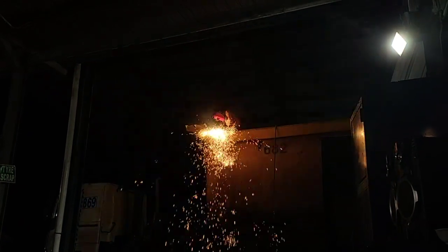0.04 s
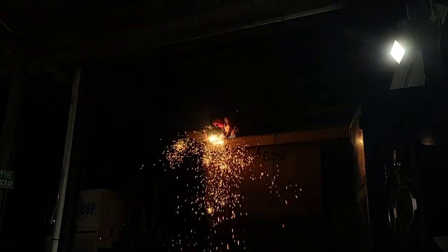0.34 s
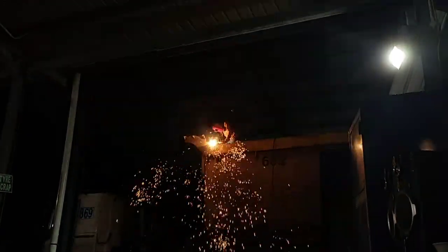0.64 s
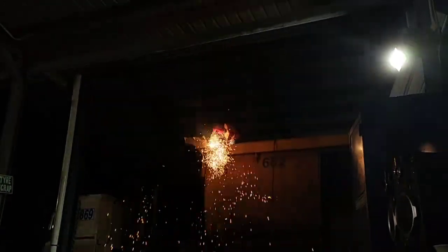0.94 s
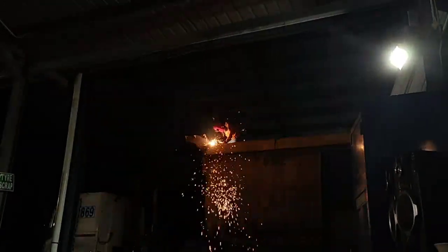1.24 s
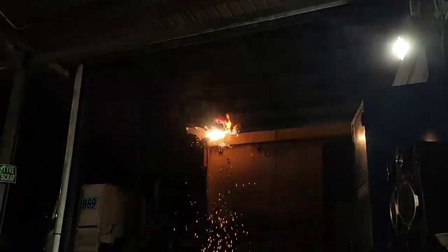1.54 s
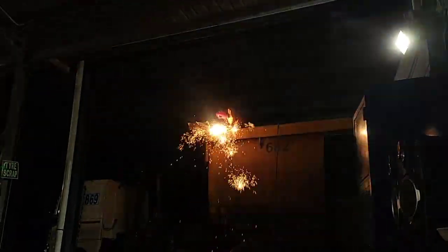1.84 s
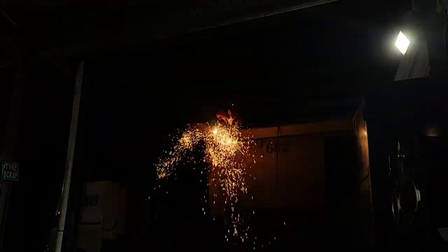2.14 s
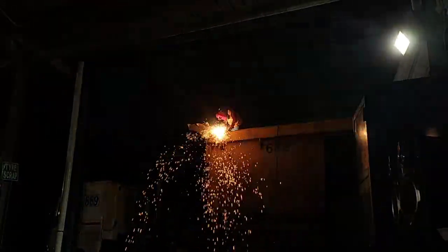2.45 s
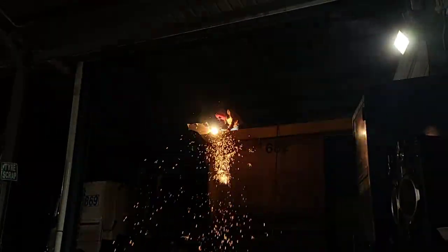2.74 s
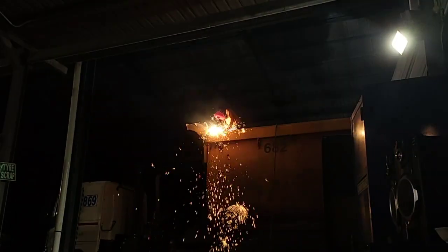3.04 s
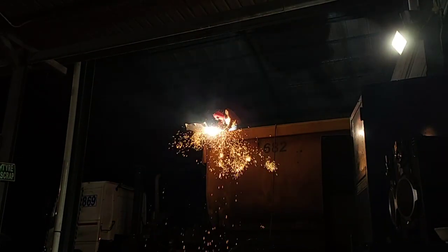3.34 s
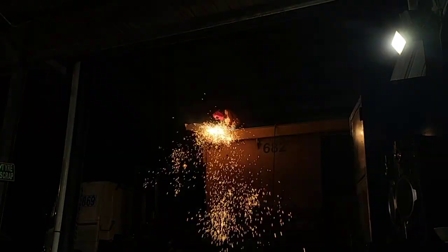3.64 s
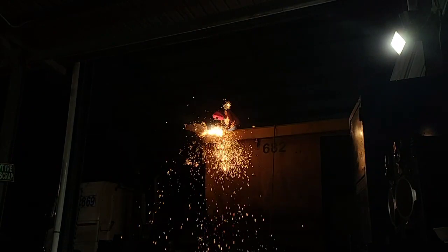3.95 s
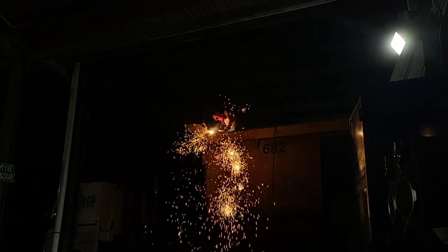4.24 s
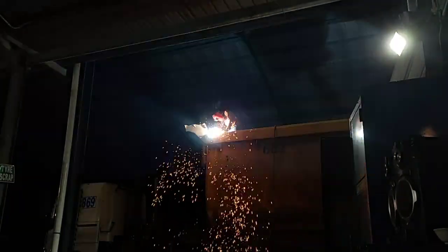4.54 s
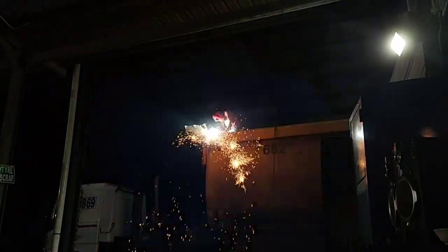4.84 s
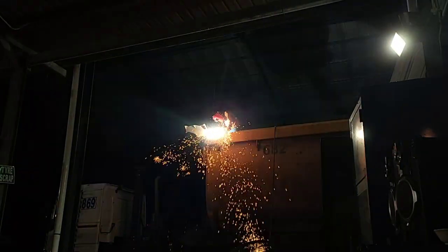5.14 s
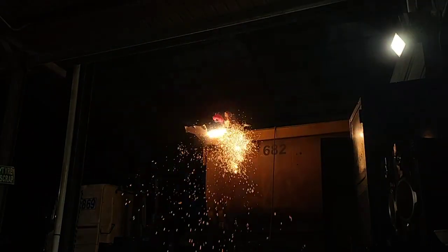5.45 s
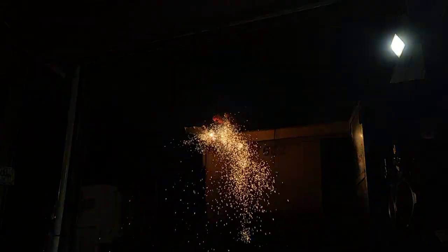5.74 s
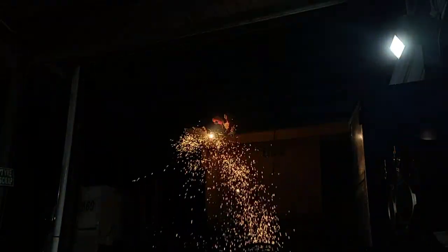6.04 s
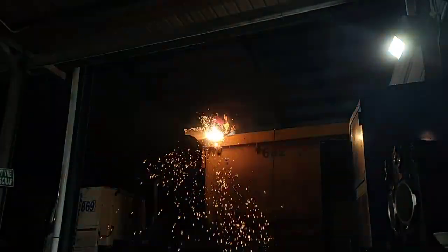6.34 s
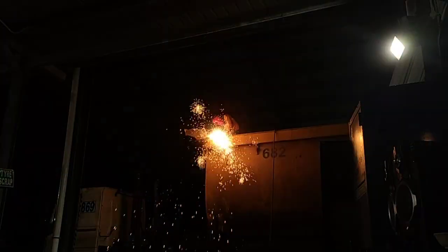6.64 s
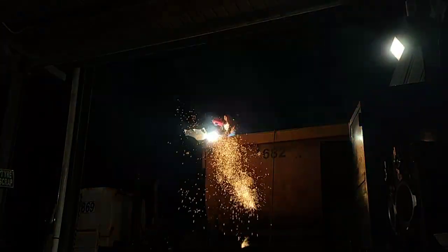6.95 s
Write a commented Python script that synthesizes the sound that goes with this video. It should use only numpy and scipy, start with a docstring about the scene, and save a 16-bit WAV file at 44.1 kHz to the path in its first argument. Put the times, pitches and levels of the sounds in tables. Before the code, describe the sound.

Loud, continuous hissing comes from a gas torch cutting steel in an open-sided workshop, heard from several metres off. About every half second it bites into the metal with a rough, fluttering roar, spitting crackles and brief pops, at times with a faint high whistle. Between surges the plain hiss returns. A low generator drone sits quietly underneath the whole time, and the space adds a short echo.

```python
"""A cutting torch works on a steel plate under an open shed roof, some metres away.
Its turbulent gas jet hisses while it runs free; whenever it bites, the cut roars and the melt sputters.
Gas pockets in the melt gurgle and pop as cavity resonators, the flame puffs, and the cleared slot whistles.
Behind it a generator hums at the harmonics of its firing rate.
Plate and shed resonate, and reflections from roof and walls spread the torch into a wide wash."""
import sys
import numpy as np
from scipy.fft import rfft, irfft, next_fast_len
from scipy.io import wavfile
from scipy.ndimage import uniform_filter1d, minimum_filter1d

SR = 44100
rng = np.random.default_rng(int(sys.argv[2]) if len(sys.argv) > 2 else 0)


def log_audio(samples):
    """Write samples as a 16-bit WAV file to the path given in sys.argv[1]."""
    # one column per channel
    frames = np.atleast_2d(samples).T
    # limit to full scale, then quantise
    limited = np.clip(frames, -1, 1)
    pcm = np.round(limited * 32767).astype(np.int16)
    wavfile.write(sys.argv[1], SR, pcm)


N = 312669
TIME = np.arange(N) / SR
SIZE = next_fast_len(N + SR)
FREQ = np.arange(SIZE // 2 + 1) * SR / SIZE

# hiss of the free-running jet: t/s, level/dB
JET_LEVELS = [(0.0, -25.5), (0.3, -26), (0.8, -22), (1.42, -25), (1.83, -22.5), (2.15, -27), (2.42, -24),
              (2.57, -24.5), (3.11, -20), (3.45, -25.5), (3.96, -21.5), (4.16, -24.5), (4.72, -22),
              (4.93, -26), (5.45, -22), (6.15, -28), (6.45, -21.5), (7.09, -25)]
# running of the engine: t/s, firing rate/Hz, level/dB
ENGINE_RUN = [(0.0, 54.4, -44.5), (0.37, 55.7, -46), (1.05, 55.6, -39.5), (1.46, 55.8, -48),
              (1.58, 54.6, -40), (2.38, 53.97, -47.5), (2.49, 54.57, -39), (4.03, 54.6, -43.5),
              (4.29, 55.4, -44), (4.35, 55.8, -41), (5.11, 55.8, -47), (5.26, 54.1, -41),
              (5.73, 54.8, -42.5), (5.92, 53.1, -49), (6.16, 55.9, -46), (6.36, 55.2, -44),
              (6.47, 54.5, -39), (7.0, 54.9, -41)]
# exhaust note: harmonic number, relative level/dB
EXHAUST_HARMONICS = [(1, -0.5), (2, -5), (3, -33), (4, -24)]
# the jet bites into fresh melt: t/s, duration/s, sputter level/dB, roar level/dB
JET_BITES = [(0.01, 0.089, -29.5, -18.5), (0.326, 0.054, -26.5, -22.5), (0.663, 0.022, -24, -19),
             (0.812, .09, -26.5, -30), (0.904, .13, -25.5, -20.5), (1.24, 0.028, -22.5, -19.5),
             (1.444, 0.48, -27, -23.5), (1.878, 0.13, -34.5, -20), (2.366, 0.045, -22.5, -19),
             (2.479, 0.079, -25, -25), (2.713, .22, -27.5, -21.5), (3.106, .19, -25.5, -20.5),
             (3.467, 0.2, -26.5, -21.5), (3.807, 0.17, -27.5, -24), (3.96, 0.12, -33, -20.5),
             (4.442, .02, -28, -29), (4.626, 0.1, -27, -22.5), (4.72, 0.1, -25, -19),
             (5.036, .46, -27, -23), (5.511, .14, -25, -21), (5.879, .025, -23, -17), (6.326, .3, -27, -24),
             (6.572, 0.15, -26.5, -20), (7, 0.045, -24.5, -18.5)]
# bursts of molten steel: t/s, relative level/dB, cavity f/Hz
MELT_POPS = [(0.341, -18, 2156), (0.671, -10, 2220), (0.817, -11, 2230), (0.849, -21, 1307),
             (0.899, -15, 2530), (0.997, -14, 2100), (1.25, -12.5, 2166), (1.274, -17, 2176),
             (1.719, -15, 2665), (1.803, -14, 2050), (2.385, -16.5, 2970), (2.482, -15, 2130),
             (2.967, -26, 2610), (4.065, -18, 2250), (4.256, -17, 2860), (4.63, -15, 2140),
             (4.691, -14.5, 2480), (4.732, -17, 2120), (5.034, -18, 1440), (5.085, -15, 1960),
             (5.446, -17, 2630), (5.885, -14, 2606), (6.342, -15.5, 2116), (6.527, -15, 2720)]
# spectral densities of the five noises: f/Hz, relative level/dB
HISS_SPECTRUM = [(60, -16), (140, -12.5), (350, -18), (700, -14.5), (1700, -6.5), (3000, -3.5), (4000, -6),
                 (4900, -9.5), (5600, -7), (6700, -8.5), (8300, -20.5), (10200, -13), (11300, -13.5),
                 (12300, -18), (15500, -24)]
RUMBLE_SPECTRUM = [(18, -22), (30, 1), (41, 3), (75, -8), (130, -1), (300, -8.5), (800, -24.5)]
SPUTTER_SPECTRUM = [(60, -33), (170, -18), (400, -19), (720, -9.5), (950, -8), (1120, -3.5), (1450, -1),
                    (1850, -3.5), (2200, 2.5), (2700, -3.5), (3700, -14), (5000, -15.5), (12000, -49)]
ROAR_SPECTRUM = [(100, -28), (330, -28.5), (550, -20), (1000, -18), (1850, -9), (2850, 1.5), (3450, -3.5),
                 (4100, -4.5), (4900, -14), (6300, -15.5), (8300, -30), (10500, -37), (15500, -52)]
FLAME_SPECTRUM = [(50, -8), (130, 0.5), (180, 2.5), (320, -5), (600, -12.5), (1500, -56)]
# dips that the slot, acting as a pipe, cuts into the roar: f/Hz, bandwidth/Hz, gain/dB
SLOT_NOTCHES = [(3020, 22, -4), (3123, 55, -4)]
# whistling modes of the cleared slot: f/Hz, bandwidth/Hz, relative level/dB
WHISTLE_MODES = [(2895, 60, -1), (3070, 54, -1), (3132, 31, 3)]
# resonances of plate and shed: f/Hz, bandwidth/Hz, gain/dB
PLATE_AND_SHED_MODES = [(305, 14, 5), (680, 18, 3.5), (1464, 18, 5.5), (1936, 16, 3.5), (1798, 16, 3),
                        (2131, 25, 2.5), (2207, 18, 4.5), (2679, 25, 2), (2876, 24, 3), (3065, 20, 2.5),
                        (3132, 14, 6), (3496, 18, 3.5), (3998, 22, 4)]
# likeness of the left and right echoes: f/Hz, correlation
ECHO_CORRELATION = [(100, 0.81), (300, 0.9), (700, 0.55), (1100, 0.32), (1700, 0.06)]
# balance of the two channels: f/Hz, left minus right level/dB
CHANNEL_BALANCE = [(400, 0.5), (1100, -0.5), (1500, -3.5), (2000, -3.5), (2800, -12.5), (3400, -5),
                   (4100, 0), (5100, 5.5), (6200, 2.5), (7400, 1.5), (8600, 6), (10500, 3), (12500, 1.5),
                   (14000, 5.5)]


def undb(db):
    """Amplitude ratio of a level in decibels."""
    return 10 ** (np.asarray(db) / 20)


def curves(table):
    """Linear interpolation of a timed table's columns, one value per sample."""
    times, *columns = np.transpose(table)
    return [np.interp(TIME, times, column) for column in columns]


def across(table):
    """Interpolation of a table (f/Hz, value) along a logarithmic frequency axis."""
    hz, value = np.transpose(table)
    return np.interp(np.log(FREQ + 1), np.log(hz), value)


def colour(table):
    """Frequency response of a spectrum, normalised to unit power."""
    gain = undb(across(table))
    return gain / np.sqrt(np.mean(gain ** 2))


def through(x, response):
    """Linear filtering: the spectrum is multiplied by a frequency response."""
    return irfft(rfft(x, SIZE) * response, SIZE)[..., :N]


def walk(cutoff_hz):
    """Low-pass noise: a smooth random fluctuation of unit variance."""
    x = through(rng.standard_normal(N), 1 / (1 + (FREQ / cutoff_hz) ** 4))
    return x / x.std()


def crackle(rate_hz, spread_db):
    """A Poisson process of clicks, many small and few large, with unit power."""
    size = undb(spread_db * np.minimum(rng.exponential(size=N), 4))
    x = (rng.random(N) < rate_hz / SR) * size * rng.choice([-1, 1], N)
    return x / x.std()


def resonance(hz, width_hz, db):
    """A damped resonance raises a peak, or cuts a dip, in a flat response."""
    return 1 + (undb(db) - 1) / (1 + 2j * (FREQ - hz) / width_hz)


def resonances(table):
    """Resonances in cascade: their responses multiply."""
    return np.prod([resonance(*mode) for mode in table], axis=0)


def jet_hiss(hiss_db, flicker_db):
    """Turbulence in the free jet radiates broadband noise whose level flickers slightly."""
    return rng.standard_normal(N) * undb(hiss_db + flicker_db)


def generator():
    """Periodic firing gives a harmonic series, slightly uneven, over a soft rumble."""
    firing_hz, level_db = curves(ENGINE_RUN)
    phase = 2 * np.pi * np.cumsum(firing_hz * (1 + 0.0094 * walk(4.3))) / SR
    note = 0
    for harmonic, db in EXHAUST_HARMONICS:
        amplitude = np.sqrt(2) * undb(db + 2.4 * walk(9.6))
        note = note + amplitude * np.sin(harmonic * phase + rng.uniform(0, 2 * np.pi))
    rumble = through(rng.standard_normal(N), colour(RUMBLE_SPECTRUM))
    return note * undb(level_db) + undb(-54) * rumble


def bite_level(peaks_db, attack_s, release_s, idle_db):
    """Incoherent addition: each bite rises, holds and decays, its power added to the idling cut (dB)."""
    power = undb(idle_db) ** 2
    for (start, length, *_), db in zip(JET_BITES, peaks_db):
        age = np.maximum(TIME - start, 0)
        envelope = (1 - np.exp(-age / attack_s)) * np.exp(-np.maximum(age - length, 0) / release_s)
        power = power + (undb(db) * envelope) ** 2
    return 10 * np.log10(power)


def cut_levels(swallow_db_per_db=0.95, lag_s=0.079):
    """Sputter, roar and hiss (dB): bites drive the first two; hiss yields to roar by a first-order lag."""
    _, _, sputter_peaks, roar_peaks = np.transpose(JET_BITES)
    roar_idle_db = -27.5
    sputter_db = bite_level(sputter_peaks, attack_s=0.0055, release_s=0.097, idle_db=-40)
    roar_db = bite_level(roar_peaks, attack_s=0.011, release_s=0.21, idle_db=roar_idle_db)
    lag = 1 / (1 + 2j * np.pi * FREQ * lag_s)
    swallowed_db = swallow_db_per_db * through(roar_db - roar_idle_db, lag)
    return sputter_db, roar_db, curves(JET_LEVELS)[0] - swallowed_db


def melt_sputter(sputter_db, flutter):
    """Shot noise: droplets tear off the melt, more of them the harder the jet bites."""
    rate_hz = 900 * undb(0.7 * (sputter_db - sputter_db.mean()))
    return crackle(rate_hz, spread_db=3.0) * undb(sputter_db + 1.5 * flutter - 1.0)


def kerf_roar(roar_db, flutter):
    """Turbulent flow carries gas and fine sparks through the slot: a fluttering, gritty roar."""
    rush = rng.standard_normal(N) + undb(-0.5) * crackle(1400, spread_db=4.0)
    return rush * undb(roar_db + 0.37 * flutter - 3.0)


def ragged_slot(depth_db=4.0, spacing_hz=110, top_hz=4500):
    """An irregular stretch of slot has random resonances; their ripple fades out in the treble."""
    knots = np.arange(0, SR / 2, spacing_hz)
    heights = rng.standard_normal(SR)[:len(knots)]
    ripple = uniform_filter1d(np.interp(FREQ, knots, heights), size=600)
    gain = undb(depth_db * ripple / ripple.std() / (1 + (FREQ / top_hz) ** 4))
    return gain / np.sqrt(uniform_filter1d(gain ** 2, size=9000))


def shed(direct_db, early_s=0.0049, late_db=-5, t60_s=0.33, right_lag_s=0.00013):
    """Multipath propagation: stereo response of direct sound, early reflections and reverberant tail."""
    t = TIME[:SR]
    early = np.exp(-t / early_s) / np.sqrt(early_s)
    late = undb(late_db - 60 * t / t60_s) / np.sqrt(t60_s / np.log(1000))
    fade = early + late
    mid, side = rfft(rng.standard_normal((2, SR)) * fade / np.linalg.norm(fade), SIZE)
    alike, sign = np.clip(across(ECHO_CORRELATION), -1, 1), np.array([[1], [-1]])
    echoes = mid * np.sqrt((1 + alike) / 2) + sign * side * np.sqrt((1 - alike) / 2)
    # the torch stands a little to the left, so its sound arrives later on the right
    direct = undb(direct_db) * np.exp(-2j * np.pi * FREQ * np.array([[0], [right_lag_s]]))
    response = echoes + direct
    # the walls ripple the spectrum finely but leave its broad shape alone
    return response / np.sqrt(uniform_filter1d(abs(response) ** 2, size=700, axis=1))


def wandering_jet(sputter_db, roar_db, hiss_db, spots=6, roar_ripple=0.74):
    """Superposition: the jet's power drifts among spots, each with its own resonances and echoes."""
    melt_flutter, kerf_flutter, flicker_db = walk(47), walk(36), walk(14)
    shares = undb(7 * np.array([walk(4) for _ in range(spots)]))
    shares /= np.linalg.norm(shares, axis=0)
    ripples = np.array([ragged_slot() for _ in range(spots)])
    ripples /= np.sqrt(np.mean(ripples ** 2, axis=0))
    droplets = colour(SPUTTER_SPECTRUM)
    slot = colour(ROAR_SPECTRUM) * resonances(SLOT_NOTCHES)
    nozzle = colour(HISS_SPECTRUM) * resonance(hz=5690, width_hz=140, db=5.0)  # a faint whistle
    total = 0
    for share, ripple in zip(shares, ripples):
        sputter = rfft(share * melt_sputter(sputter_db, melt_flutter), SIZE) * droplets * ripple
        roar = rfft(share * kerf_roar(roar_db, kerf_flutter), SIZE) * slot * ripple ** roar_ripple
        hiss = rfft(share * jet_hiss(hiss_db, flicker_db), SIZE) * nozzle
        total = total + (sputter + roar + hiss) * shed(direct_db=-12)
    return irfft(total, SIZE)[:, :N]


def flame_puffs(sputter_db, hiss_db):
    """Combustion noise: low puffs, loudest when a strong jet meets fresh melt."""
    puff_db = 0.37 * (sputter_db - sputter_db.mean()) + 1.5 * (hiss_db - hiss_db.mean())
    puffs = rng.standard_normal(N) * undb(puff_db + 2.0 * walk(22) - 50)
    return through(puffs, colour(FLAME_SPECTRUM))


def cavity(hz, life_s, glide=0.056):
    """Cavity resonance: the tone of a gas pocket in the melt swells, decays and rises a little in pitch."""
    age = TIME[:SR // 8] / life_s
    phase = 2 * np.pi * hz * life_s * age * (1 + glide * age / 10)
    return age * np.exp(1 - age) * np.sin(phase)


def gurgle(sputter_db, count=420, life_s=0.0027, low_hz=1050, high_hz=2700, level_db=-4):
    """Pockets of all sizes resonate at random times, loudest while the melt sputters."""
    out = np.zeros(N + SR)
    for when, pitch, life, strength in rng.random((count, 4)):
        start = int(when * N)
        pocket = cavity(low_hz * (high_hz / low_hz) ** pitch, life_s * (0.5 + life))
        out[start:start + len(pocket)] += pocket * strength * undb(sputter_db[start] + level_db)
    return out[:N]


def slot_whistle(sputter_db, roar_db, level_db=-5, clear_db=10, transition_db=1.5):
    """Pipe resonance: once the melt is blown clear and roar outweighs sputter, the slot whistles."""
    opening = 1 / (3 + np.exp((clear_db - roar_db + sputter_db) / transition_db))
    pipe = sum(undb(db) / (1 + 2j * (FREQ - hz) / width_hz) ** 2 for hz, width_hz, db in WHISTLE_MODES)
    gas = rng.standard_normal(N) * opening * undb(roar_db + level_db)
    return through(gas, pipe / np.sqrt(np.mean(abs(pipe) ** 2)))


def slag_choke(sag_db=2.5, sag_s=0.016, kick_db=1.5, kick_s=0.01, full_pop_db=-19):
    """Flow obstruction: slag plugs the slot before each pop, then lets go; the level sags, then kicks."""
    change_db, t = np.zeros(N + SR), TIME[:SR // 8]
    shape_db = np.concatenate([-sag_db * np.exp(-t[::-1] / sag_s), kick_db * np.exp(-t / kick_s)])
    for onset_s, db, _ in MELT_POPS:
        start = int(onset_s * SR) - len(t)
        change_db[start:start + len(shape_db)] += min(undb(db - full_pop_db), 1) * shape_db
    return change_db[:N]


def pops(hiss_db, crack_s=0.0031, spray_db=-14, spray_s=0.046, ring_db=-6, ring_s=0.0068, thump_db=-22):
    """Impulsive excitation: a crack, a ringing cavity, thinning spray and a thump that grows with the jet."""
    cracks, tones, t = np.zeros(N + SR), np.zeros(N + SR), TIME[:SR // 8]
    fade = np.exp(-t / crack_s) + undb(spray_db) * np.exp(-t / spray_s)
    for onset_s, db, hz in MELT_POPS:
        start = int(onset_s * SR)
        span = slice(start, start + len(t))
        cracks[span] += undb(db) * rng.standard_normal(len(t)) * fade
        tones[span] += undb(db + ring_db) * cavity(hz, ring_s)
    thumps = through(cracks[:N] * undb(thump_db + hiss_db - hiss_db.mean()), colour(FLAME_SPECTRUM))
    ragged = undb(1.9 * walk(300) - 3.5)  # the slag tears off in pieces
    return through(cracks[:N] * ragged, colour(SPUTTER_SPECTRUM)) + tones[:N] + thumps


def limit(x, ceiling_db=-4.0, window=200):
    """Peak limiting: one smoothed gain turns both channels down around the highest peaks."""
    gain = np.minimum(1, undb(ceiling_db) / (abs(x).max(axis=0) + 1e-9))
    return x * uniform_filter1d(minimum_filter1d(gain, window), window)


def scene():
    """Source and filter: the torch's sounds excite the modes of plate and shed; the generator adds hum."""
    sputter_db, roar_db, hiss_db = cut_levels()
    choke_db = slag_choke()
    near_path = shed(direct_db=0, early_s=0.005, late_db=-4)
    details = through(pops(hiss_db) + gurgle(sputter_db) + slot_whistle(sputter_db, roar_db), near_path)
    wash = wandering_jet(sputter_db + choke_db, roar_db + 0.25 * choke_db, hiss_db)
    torch = wash + details + flame_puffs(sputter_db, hiss_db)
    return through(torch, resonances(PLATE_AND_SHED_MODES)) + generator()


def record(dry, top_hz=15750):
    """Constant-power balance colours each channel; a limiter and a steep low-pass follow."""
    lean = undb(across(CHANNEL_BALANCE) * np.array([[1], [-1]]) / 2)
    balance = lean / np.sqrt(np.mean(lean ** 2, axis=0))
    low_pass = np.clip((top_hz - FREQ) / 100 + 0.5, 0, 1)
    return through(limit(through(dry, balance)), low_pass)


dry = scene()
out = record(dry)
log_audio(out)
```